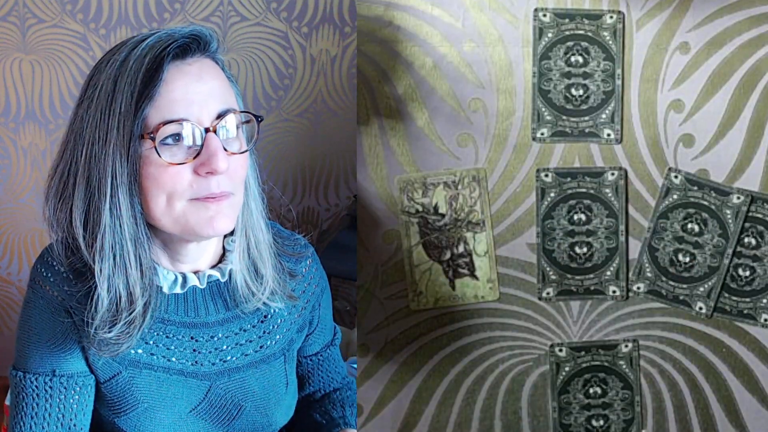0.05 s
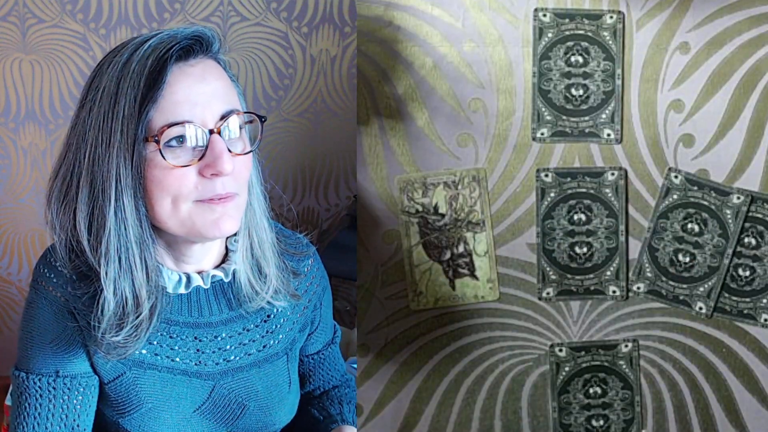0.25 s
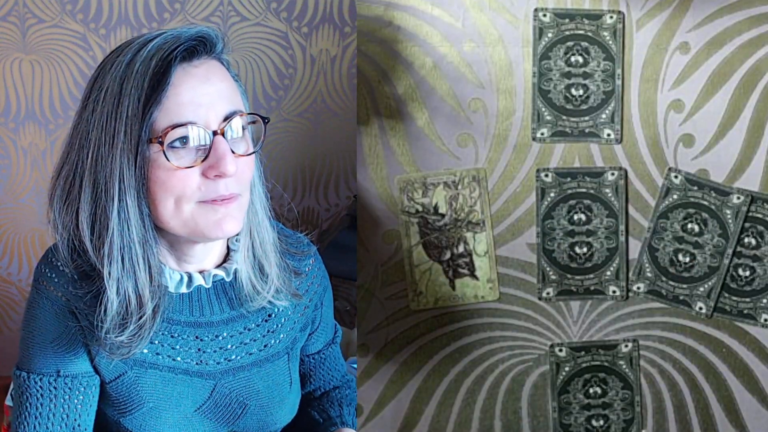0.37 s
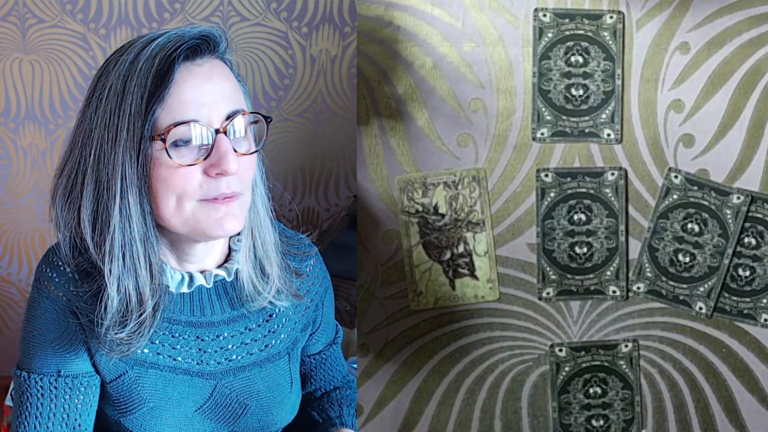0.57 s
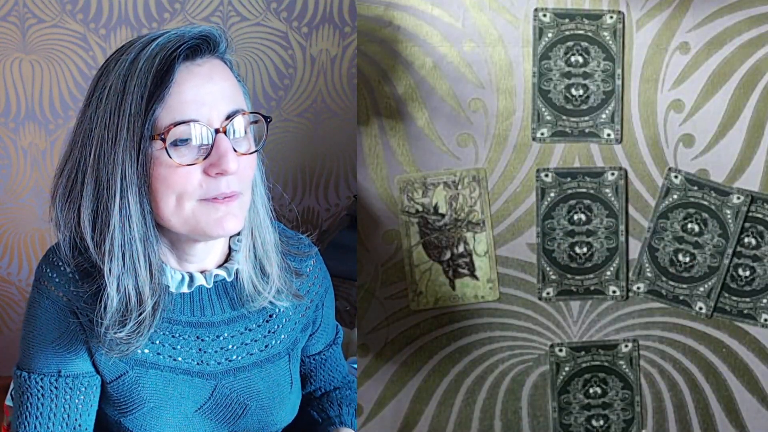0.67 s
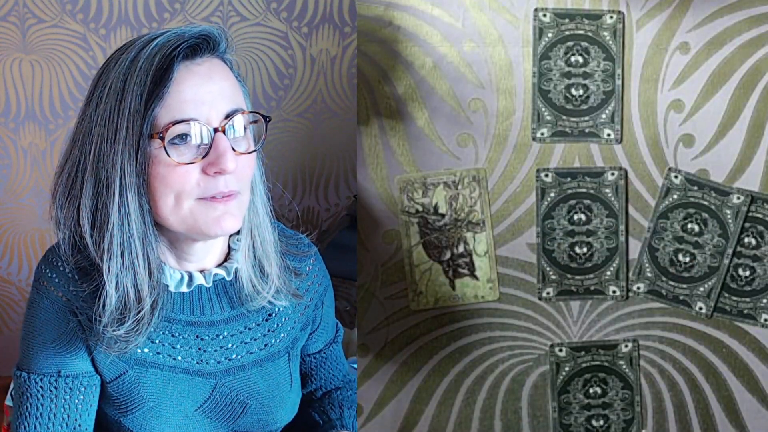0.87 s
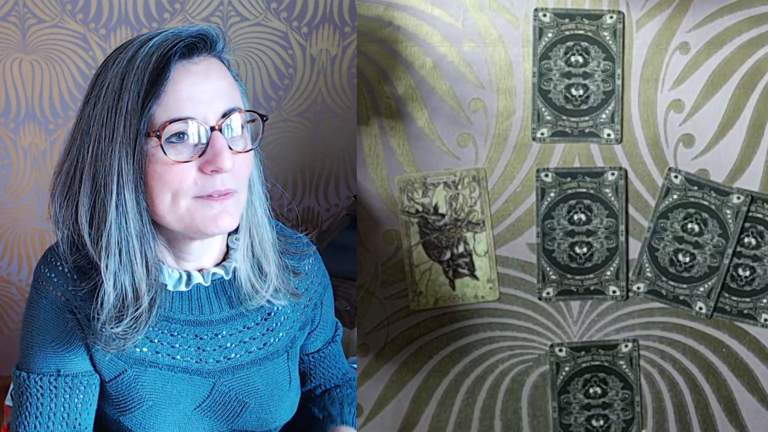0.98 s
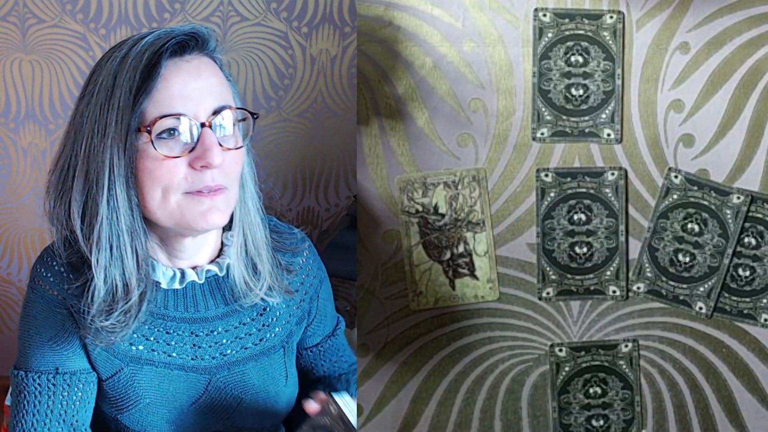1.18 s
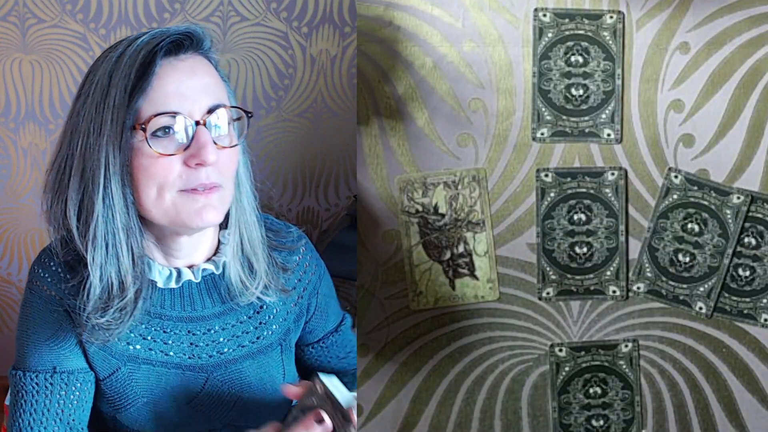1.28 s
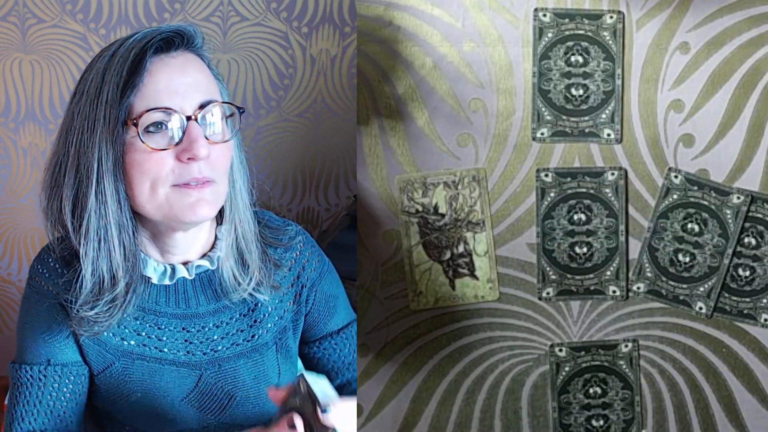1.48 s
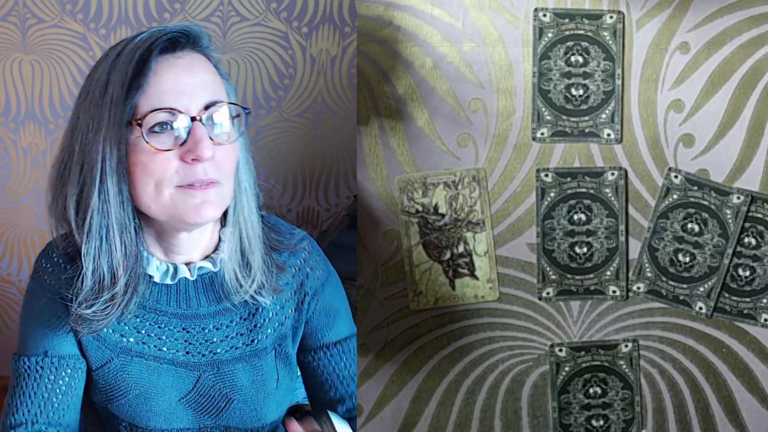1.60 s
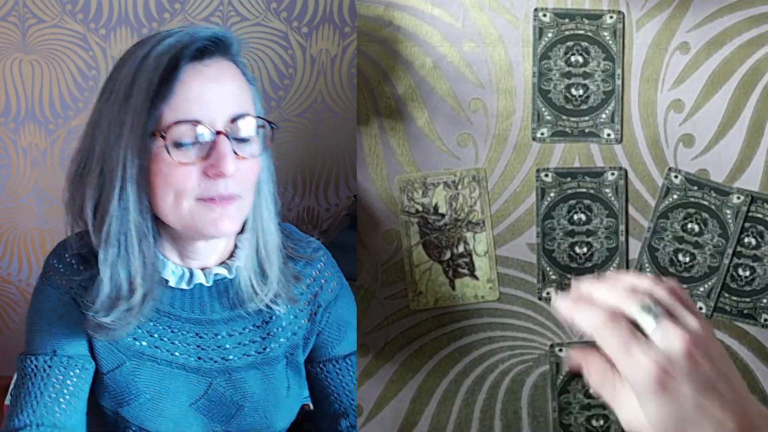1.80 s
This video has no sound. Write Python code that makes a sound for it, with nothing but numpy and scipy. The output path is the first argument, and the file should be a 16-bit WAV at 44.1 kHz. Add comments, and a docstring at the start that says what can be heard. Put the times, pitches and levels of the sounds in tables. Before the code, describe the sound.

Three sharp knocks of a card deck on a table, followed by soft sliding and ticking.

```python
"""Knocking a deck of cards level

A deck is knocked on edge three times on a cloth-covered table in a small, slightly ringing room.
Each knock is a quick cluster of contacts as the cards drop level; the table top thuds and sways.
Afterwards the cards slide softly in the hand and a few edges tick past the fingers, over a faint hum."""
import sys
import numpy as np
from scipy import signal
from scipy.fft import rfft, irfft
from scipy.io import wavfile
from scipy.ndimage import uniform_filter1d

SR = 44100
rng = np.random.default_rng(int(sys.argv[2]) if len(sys.argv) > 2 else 0)


def pcm_store(signal):
    """Save signal as 16-bit PCM."""
    levels = np.round(np.clip(np.atleast_2d(signal), -1, 1) * 32767)
    wavfile.write(sys.argv[1], SR, levels.astype(np.int16).T)


N = 81585
T = np.arange(N) / SR
CUTOFF_HZ, THUD_RISE_S = 9800, 0.004


def from_db(db):
    return 10 ** (np.asarray(db) / 20)


def at_hz(points, hz, column=1):
    """Table column interpolated over log frequency."""
    points = np.array(points)
    return np.interp(np.log(np.maximum(hz, 1)), np.log(points[:, 0]), points[:, column])


def noise(spectrum):
    """Shaped noise below the cutoff, rms 1."""
    hz = np.arange(N // 2 + 1) * SR / N
    x = irfft(rfft(rng.standard_normal(N)) * from_db(at_hz(spectrum, hz)) * (hz < CUTOFF_HZ), N)
    return x / x.std()


def low_cut(x, hz):
    return signal.sosfilt(signal.butter(2, hz, "high", fs=SR, output="sos"), x)


def decay(start_s, t60_s):
    """Jump to 1, then exponential fall."""
    return (T >= start_s) * np.exp(-np.log(1000) * np.clip((T - start_s) / t60_s, 0, 10))


def ring(start_s, hz, t60_s):
    """Struck mode."""
    return decay(start_s, t60_s) * np.sin(2 * np.pi * hz * (T - start_s))


def swell(start_s, rise_s):
    """Exponential rise from 0 to 1."""
    return 1 - np.exp(-np.maximum(T - start_s, 0) / rise_s)


# card edges on the table: start_s, level_db, lowpass_hz, snap_db, snap_hz
EDGE_CONTACTS = [(0.2014, -11, 2080, -10, 2310), (0.2206, -7, 5130, -3.5, 3755),
                 (0.2248, -3, 4800, -1.5, 2370), (0.2304, -5.5, 4500, -4, 3116),
                 (0.2348, -4.5, 5560, 0, 2180), (0.2393, -11, 3000, 3.5, 1700),
                 (0.4590, -11.5, 1700, -11.5, 1350), (0.4640, -13, 5760, -4.5, 3400),
                 (0.4677, 0.5, 2780, -8.5, 2834), (0.4698, -9.5, 3650, -5, 3090),
                 (0.731, -1, 2300, -5.5, 1650), (0.734, -2, 3800, -10.5, 4690),
                 (0.736, -9, 2600, 0.5, 1996)]
# modes of deck and table: pitch_hz, level_db, t60_s
DECK_MODES = [(300.7, -24, 0.027), (391, -33, 0.056), (476, -25.5, 0.03), (618.3, -15.5, .045),
              (697.5, -18.5, 0.055), (972, -27.5, 0.031), (1000, -10.5, 0.034), (1209, -13, .06),
              (1314, -12.5, .05), (1650, -18, 0.047), (2031, -23.5, 0.11), (2335, -25, 0.061),
              (2726, -14.5, 0.057), (4160, -28.5, 0.075)]
# single cards landing: freq_hz, density_db
CLATTER_SPECTRUM = [(200, -2), (500, 4), (1500, 1), (3000, -3), (4800, -2), (6500, -9.5), (9500, 2)]


def knocks():
    """Each contact rings deck and table; single cards clatter and snap."""
    out = 0
    for start_s, level_db, lowpass_hz, snap_db, snap_hz in EDGE_CONTACTS:
        clack = sum(from_db(db) * ring(start_s, hz, t60_s) for hz, db, t60_s in DECK_MODES)
        clatter = from_db(-10) * noise(CLATTER_SPECTRUM) * decay(start_s, t60_s=0.026)
        snap = from_db(snap_db) * ring(start_s, snap_hz, t60_s=0.013)
        softness = signal.butter(2, lowpass_hz, fs=SR, output="sos")
        out += from_db(level_db) * signal.sosfilt(softness, clack + clatter + snap)
    return low_cut(out, hz=110)


# hand's weight on the table: start_s, level_db, push_hz
HAND_PUSHES = [(0.202, -13.5, 185), (0.234, -3.5, 135), (0.4712, 3.5, 198), (0.7370, 4, 129)]
# table top: pitch_hz, level_db, t60_s
TOP_MODES = [(106, -18.5, 0.27), (129.8, -12, 0.26), (148.3, -9, 0.16), (177.3, -3.5, 0.14),
             (210, -24, 0.03), (272.3, -30, 0.31), (309.2, -33, 0.39)]


def table_thuds():
    """Each push booms the top's modes near push_hz and sways the whole table."""
    falloff_db_per_octave = 6.5
    out = 0
    for start_s, level_db, push_hz in HAND_PUSHES:
        boom = 0
        for hz, db, t60_s in TOP_MODES:
            octaves_off = abs(np.log2(hz / push_hz))
            boom += from_db(db - falloff_db_per_octave * octaves_off) * ring(start_s, hz, t60_s)
        sway = from_db(-33) * ring(start_s, hz=26, t60_s=0.8)
        out += from_db(level_db) * swell(start_s, THUD_RISE_S) ** 2 * (boom + sway)
    return out


# edge flicks: start_s, level_db
EDGE_FLICKS = [(0.7580, -29), (1.0345, -51), (1.0931, -52.5), (1.249, -38), (1.2690, -52), (1.281, -51),
               (1.3045, -44.5), (1.3191, -46.5), (1.3316, -50), (1.3627, -54)]
# flick noise: freq_hz, density_db
FLICK_SPECTRUM = [(500, -13), (2500, -20.5), (5000, -15.5), (7500, -7), (9500, -3.5)]


def edge_ticks():
    """Single card edges flick past the fingers."""
    envelope = sum(from_db(db) * decay(start_s, t60_s=0.0052) for start_s, db in EDGE_FLICKS)
    return envelope * noise(FLICK_SPECTRUM)


# hand against the table: start_s, level_db, pitch_hz, t60_s
HAND_BUMPS = [(0.020, -33, 143, .22), (1.150, -44, 59.6, .4), (1.312, -32.5, 99, 0.066),
              (1.691, -55.5, 180, 0.46)]


def hand_bumps():
    """Each soft bump rings one low table mode."""
    return sum(from_db(db) * swell(start_s, THUD_RISE_S) * ring(start_s, hz, t60_s)
               for start_s, db, hz, t60_s in HAND_BUMPS)


# card over card: peak_s, level_db, rise_s, fall_s
SLIDE_STROKES = [(0.035, -58.5, 0.12, 0.046), (0.975, -61, 0.076, 0.046), (1.180, -58, 0.034, 0.024),
                 (1.234, -55.5, 0.025, 0.014), (1.670, -71, 0.003, 0.038)]
# card friction: freq_hz, density_db
SLIDE_SPECTRUM = [(300, 1.5), (1200, -3), (3000, -10.5), (5500, -10), (8000, -4), (9500, -4.5)]


def card_slides():
    """Cards slide over each other in bell-shaped strokes."""
    power = 0
    for peak_s, level_db, rise_s, fall_s in SLIDE_STROKES:
        width_s = np.where(T < peak_s, rise_s, fall_s)
        power += from_db(level_db) ** 2 * np.exp(-((T - peak_s) / width_s) ** 2)
    return np.sqrt(power) * noise(SLIDE_SPECTRUM)


# hand along the deck: start_s, level_db, t60_s, low_cut_hz
BRUSH_STROKES = [(0.014, -54, .3, 70), (1.207, -44, 0.14, 90), (1.665, -55, 0.31, 497),
                 (1.820, -61.5, 0.33, 91)]
# hand friction: freq_hz, density_db
BRUSH_SPECTRUM = [(60, -7), (220, -2), (350, -5.5), (750, -14.5), (1500, -22.5), (3500, -19.5), (9000, -22)]


def hand_brushes():
    """The hand meets the deck and rubs along it, duller than the cards."""
    rub = noise(BRUSH_SPECTRUM)
    return sum(from_db(db) * decay(start_s, t60_s) * low_cut(rub, hz)
               for start_s, db, t60_s, hz in BRUSH_STROKES)


def friction(grain_db=3):
    """Slides and brushes, made grainy by a shared level flicker."""
    flicker = uniform_filter1d(rng.standard_normal(N), size=60)
    return from_db(grain_db * flicker / flicker.std()) * (card_slides() + hand_brushes())


# diffuse room tail: freq_hz, gain_db, t60_s
ROOM_TAIL = [(151, -7, .33), (300, -11, 0.32), (700, -12, 0.31), (1100, -10.5, 0.38), (1800, -5.5, 0.37),
             (3300, -6, 0.33), (5042, -5.5, .33), (5900, -16, 0.25), (9500, -9, 0.2)]
# room resonances: pitch_hz, gain_db, t60_s
ROOM_RESONANCES = [(572, -70, 0.53), (1218, -70, .34), (1270, -68, 0.33), (1662, -66, 0.48),
                   (1985, -63, .35), (2390, -66.5, 0.34), (3410, -61, 0.44), (4350, -61.5, .3)]


def room_reverb(x, build_s=0.005):
    """The room stores energy per sixth of an octave and releases it as noise; a few modes ring clear."""
    edges_hz = 120 * 2 ** (np.arange(39) / 6)
    white = rng.standard_normal((2, N))
    build_pole = np.exp(-1 / (build_s * SR))
    tail = 0
    for k, (low_hz, high_hz) in enumerate(zip(edges_hz, edges_hz[1:])):
        centre_hz = np.sqrt(low_hz * high_hz)
        band = signal.butter(2, [low_hz, high_hz], "band", fs=SR, output="sos")
        t60_s = at_hz(ROOM_TAIL, centre_hz, column=2)
        decay_pole = np.exp(-2 * np.log(1000) / (t60_s * SR))
        energy = signal.sosfilt(band, x + 1e-18) ** 2
        for pole in (build_pole, decay_pole):
            energy = signal.lfilter([1 - pole], [1, -pole], energy)
        wash = signal.sosfilt(band, white[k % 2])  # adjacent bands uncorrelated
        tail += from_db(at_hz(ROOM_TAIL, centre_hz)) * np.sqrt(energy) * wash / wash.std()
    modes = sum(from_db(db) * ring(0, hz, t60_s) for hz, db, t60_s in ROOM_RESONANCES)
    return tail + signal.fftconvolve(x, modes)[:N]


# background noise: freq_hz, density_db
FLOOR_SPECTRUM = [(20, -5.5), (50, -13.5), (80, -27.5), (125, -18.5), (280, -35), (600, -37.5),
                  (2000, -43.5), (9500, -50.5)]
# steady hum: pitch_hz, rms_db
HUM_TONES = [(49, -53.5), (118.4, -65.5), (1357, -83.5), (2046, -89)]


def room_tone():
    """Faint hiss, rumble and hum."""
    hum = sum(np.sqrt(2) * from_db(db) * np.sin(2 * np.pi * (hz * T + rng.random()))
              for hz, db in HUM_TONES)
    return from_db(-55) * noise(FLOOR_SPECTRUM) + hum


def scene():
    """Mono mix; only the knocks feed the reverb."""
    deck = knocks()
    reverb = room_reverb(deck)
    handling = friction() + edge_ticks() + hand_bumps()
    return (deck + table_thuds() + handling + reverb + room_tone())[None]


def record(dry):
    """Soft clip, then a steep lowpass."""
    ceiling = 0.73
    clipped = dry / (1 + (dry / ceiling) ** 6) ** (1 / 6)
    lowpass = signal.ellip(10, 0.3, 70, CUTOFF_HZ, fs=SR, output="sos")
    return signal.sosfilt(lowpass, clipped)


dry = scene()
out = record(dry)
pcm_store(out)
```